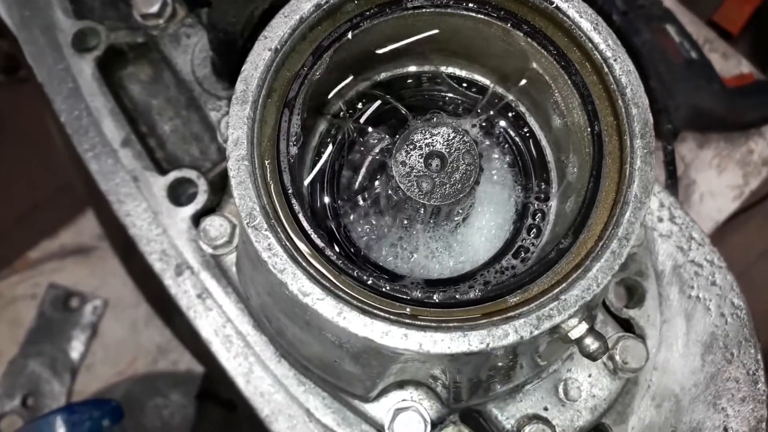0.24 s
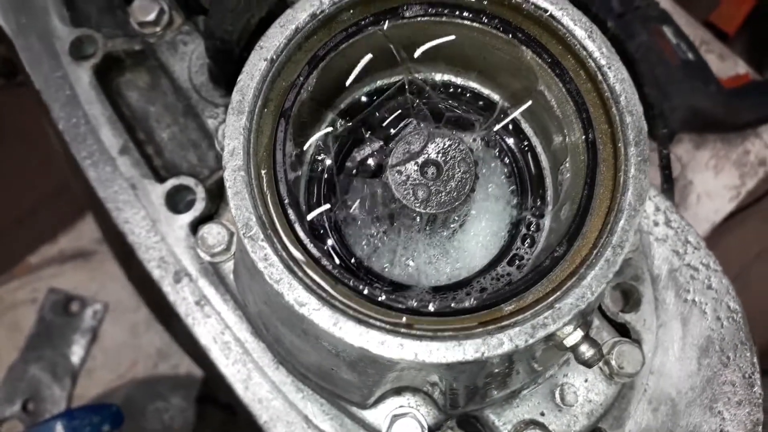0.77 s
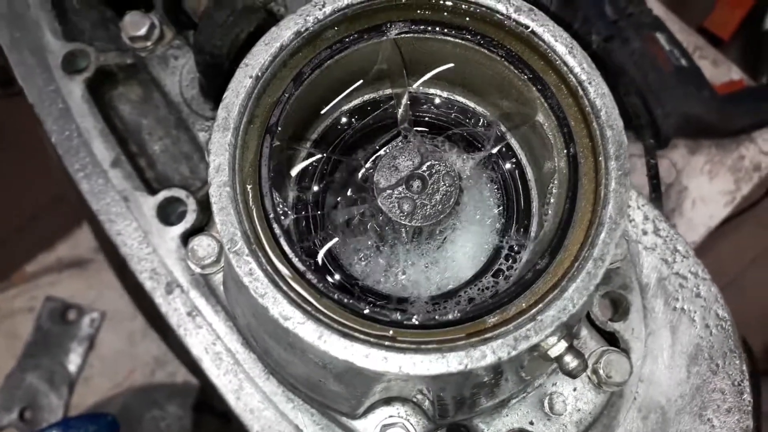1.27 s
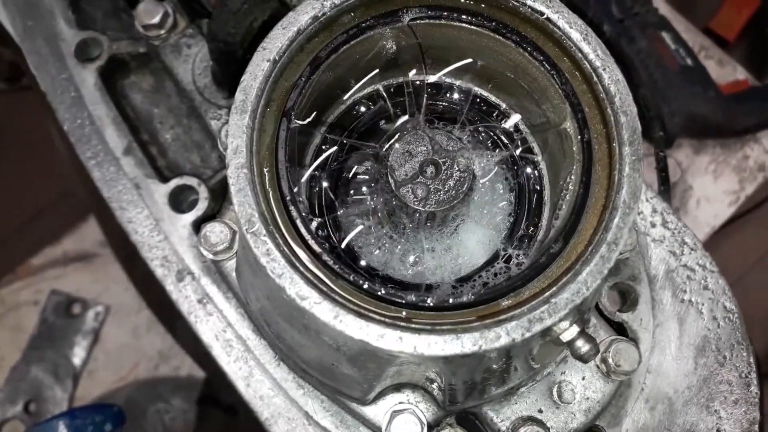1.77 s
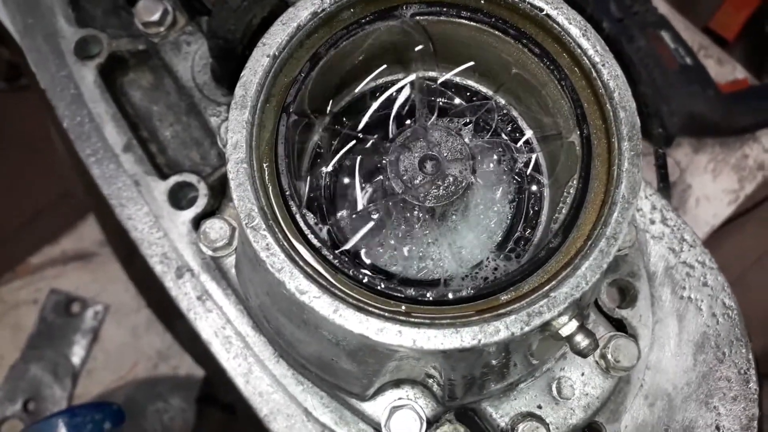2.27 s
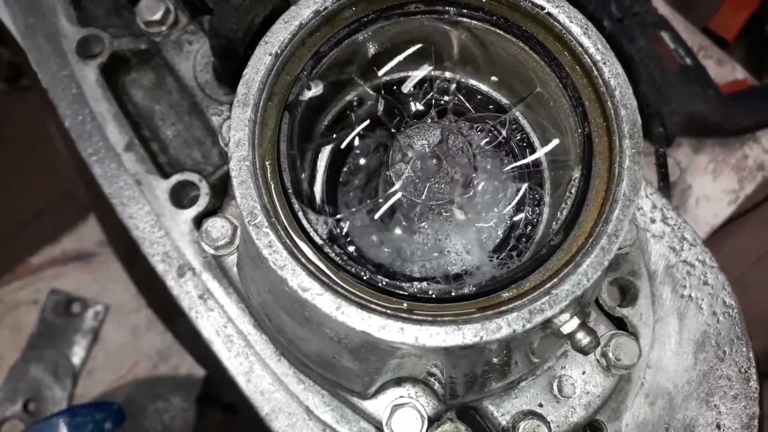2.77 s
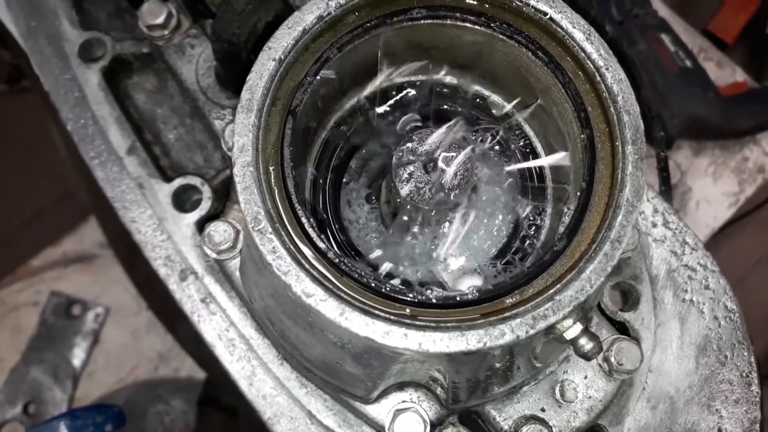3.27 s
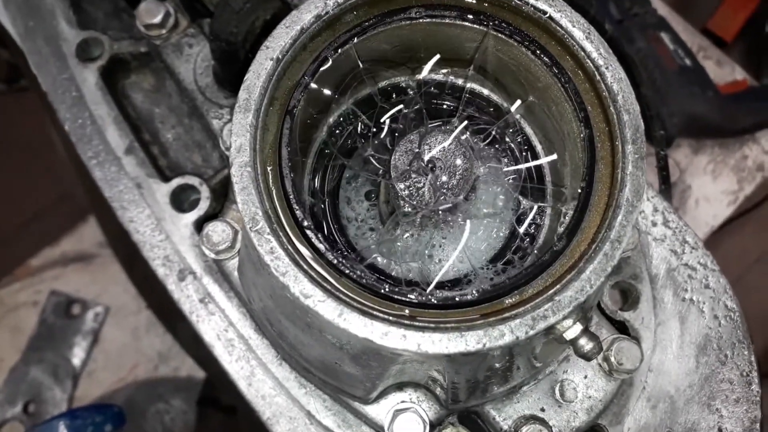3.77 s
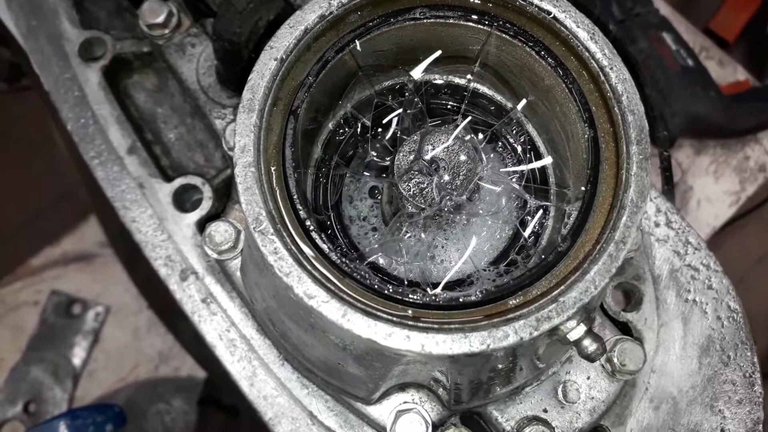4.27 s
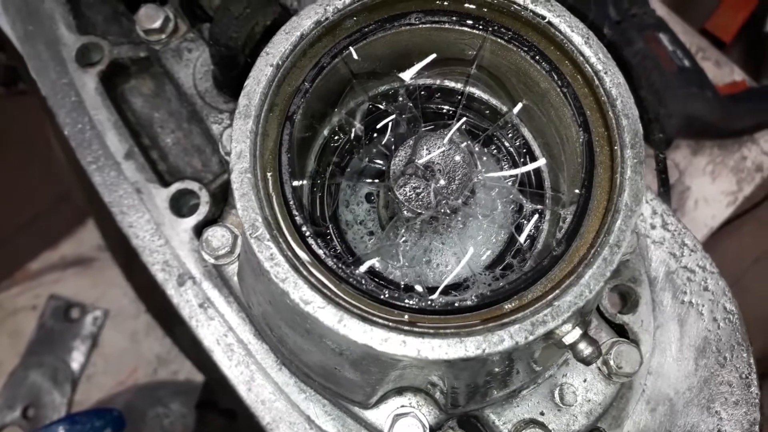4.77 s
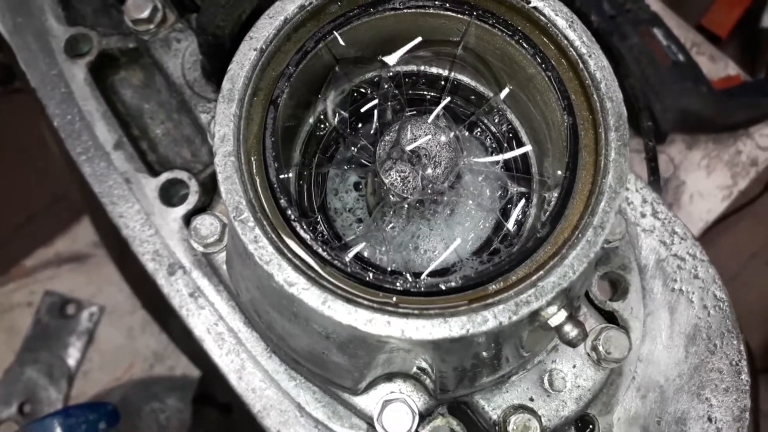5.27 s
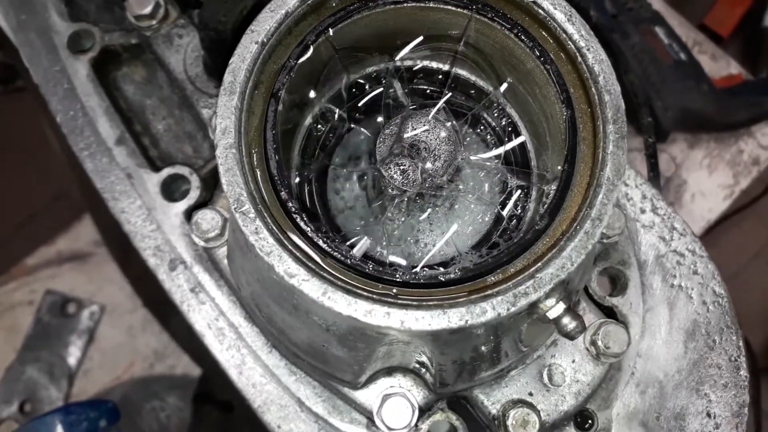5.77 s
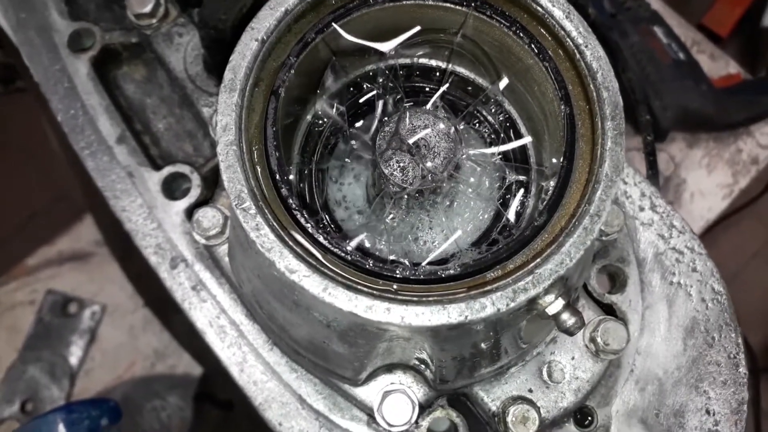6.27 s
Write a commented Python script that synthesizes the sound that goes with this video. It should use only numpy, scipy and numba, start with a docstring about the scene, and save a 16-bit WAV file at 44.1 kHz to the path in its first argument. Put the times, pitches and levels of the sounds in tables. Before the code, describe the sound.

Compressed air fizzes and sputters through a shallow pool of liquid in a metal housing, then spurts hard and settles into steady bubbling hiss.

```python
"""Compressed air leaks past a seal into a metal housing with a pool of liquid, near a phone in a quiet workshop.
At first swarms of damped sines fizz as bubbles, filtered noise puffs at the wet gap and air squirts in chirps.
At about 2 s a strong spurt blows the liquid aside: noise rushes and rings resonant modes of the housing.
The cleared gap then hisses on with thin singing jets, popping films and a few dull knocks.
A second spurt at about 5.6 s rings the housing again, and the hiss swells after it."""
import sys
import numpy as np
from scipy import signal
from scipy.fft import rfft, irfft, next_fast_len
from scipy.io import wavfile
from scipy.ndimage import uniform_filter1d, map_coordinates
from numba import njit

SR = 44100
rng = np.random.default_rng(int(sys.argv[2]) if len(sys.argv) > 2 else 0)


def output_pcm(signal):
    """Save a mono or channel-first signal as 16-bit PCM at the path in sys.argv[1].

    Samples are clipped to [-1, 1] before scaling.
    """
    pcm = np.clip(np.atleast_2d(signal).T, -1, 1) * 32767
    wavfile.write(sys.argv[1], SR, np.round(pcm).astype(np.int16))


N = 288414
TIME = np.arange(N) / SR  # s

# Strong spurts of air: [start t/s, end t/s, relative level of the rush/dB, relative level of the ring/dB]
SPURT_EVENTS = [(1.968, 2.105, -40.5, -37.5), (5.635, 5.831, -38.5, -39.5)]
# Short squirts of air, and at 0.623 s a surge of bubbling:
# [start t/s, length t/s, first f/Hz, last f/Hz, relative level/dB]
SQUIRT_EVENTS = [(.062, 0.044, 6360, 4200, -47), (0.135, 0.017, 5600, 4540, -53),
                 (0.302, 0.065, 7050, 4400, -51.5), (0.334, 0.094, 4760, 4200, -54.5),
                 (0.585, 0.064, 5170, 3950, -49), (0.623, 0.07, 3040, 2800, -53),
                 (0.667, 0.046, 4500, 4000, -49.5), (0.818, 0.071, 7900, 4670, -49.5),
                 (0.885, 0.036, 6600, 4530, -50), (0.912, 0.036, 8060, 4700, -51.5),
                 (0.954, 0.022, 5600, 4800, -50), (0.982, 0.051, 5100, 4500, -51.5),
                 (1.216, 0.052, 5200, 5000, -53), (1.369, 0.077, 6260, 3970, -49),
                 (1.45, 0.028, 7000, 5070, -56), (1.516, 0.0081, 6800, 6300, -49),
                 (1.557, 0.0061, 6560, 5170, -45), (1.596, 0.048, 6860, 4670, -51.5),
                 (1.69, 0.016, 6860, 6160, -47.5), (1.706, 0.0094, 6600, 4930, -45.5),
                 (1.76, 0.018, 5600, 5800, -48), (1.782, 0.01, 6540, 6560, -48),
                 (1.996, 0.038, 2920, 2550, -43.5), (5.66, 0.12, 2710, 2500, -42.5)]
# Notches where sound cancels between the pool and the rim: [centre f/Hz, width f/Hz, depth as level/dB]
RIM_NOTCHES = [(1947, 151, -11.5), (3567, 620, -9.5), (6220, 240, -6)]


def amp(db):
    """Decibels to gain."""
    return 10 ** (np.asarray(db) / 20)


def unit(x):
    """Scale to rms 1."""
    return x / np.sqrt(np.mean(x ** 2))


def curves(rows):
    """The columns of a timed table, interpolated to one value a sample."""
    times, *columns = np.transpose(rows)
    return [np.interp(TIME, times, column) for column in columns]


def add(track, start_s, sound):
    """Mix a sound into a track at a moment in seconds."""
    i = int(start_s * SR)
    track[i:i + len(sound)] += sound[:N - i]


def together(*gains):
    """Level of unrelated sounds that play at once: their powers add."""
    return np.sqrt(sum(gain ** 2 for gain in gains))


def swell(start_s, end_s, attack_s, release_s):
    """Envelope that rises linearly from the start, holds until the end and then dies away exponentially."""
    rise = np.clip((TIME - start_s) / max(attack_s, .001), 0, 1)
    return rise * np.exp(-np.maximum(TIME - end_s, 0) / release_s)


def walk(rate):
    """Random levels held 1 / rate s and smoothed twice; spread near 1."""
    hold = max(int(SR / rate), 1)
    steps = rng.standard_normal(N)[np.arange(N) // hold]
    return 1.3 * uniform_filter1d(uniform_filter1d(steps, hold), hold)


def colour(x, spectrum, notches=()):
    """Minimum-phase filter with a (Hz, dB) outline, steep skirts beyond it and rounded notches; rms 1."""
    size = 2 * next_fast_len(N // 2 + 4096)
    f = np.maximum(np.arange(size // 2 + 1) * SR / size, 1)
    hz, db = np.transpose(spectrum)
    octaves_outside = np.minimum(np.abs(np.log2(f / np.clip(f, hz[0], hz[-1]))), 1)
    gain_db = np.interp(np.log(f), np.log(hz), db) - 40 * octaves_outside
    gain_db += sum(depth / (1 + (2 * (f - centre) / width) ** 2) for centre, width, depth in notches)
    # folding the cepstrum onto positive time makes the filter causal
    cepstrum = irfft(np.log(amp(gain_db)))
    cepstrum[1:size // 2] *= 2
    cepstrum[size // 2 + 1:] = 0
    response = np.exp(rfft(cepstrum))
    return unit(irfft(rfft(x, size) * response)[:N])


@njit
def svf(x, hz, width):
    """State-variable band-pass with a moving centre, gain 1 there."""
    y, band, low = np.empty(len(x)), 0., 0.
    for i in range(len(x)):
        g = np.tan(np.pi * hz[i] / SR)
        k = np.pi * width / SR * (1 + g * g) / g
        v = (band + g * (x[i] - low)) / (1 + g * (g + k))
        band, low, y[i] = 2 * v - band, low + 2 * g * v, k * v
    return y


@njit
def ring_bubbles(starts, hz, cycles, size, rise):
    """Each bubble is a damped sine whose pitch climbs as it nears the surface."""
    y = np.zeros(N)
    for k in range(len(starts)):
        count = int(cycles[k] * SR / hz[k])  # samples until the bubble is 60 dB down
        z, step = size[k] + 0j, 2 * np.pi * hz[k] / SR
        turn = np.exp(1j * step - np.log(1000) / count)
        glide = np.exp(1j * step * rise / count)
        for i in range(starts[k], min(starts[k] + count, N)):
            z *= turn
            turn *= glide
            y[i] += z.imag
    return y


def swarm(low_hz, high_hz, cycles, spread_db, count):
    """Bubbles of mixed size born at random moments; a wider spread makes a few much louder than the rest."""
    when, size, life, loud, sign = rng.random((count, 5)).T
    starts = (when * N).astype(np.int64)
    low = np.broadcast_to(low_hz, N)[starts]
    hz = low * (high_hz / low) ** size
    strength = amp(-spread_db * np.log(1 - .99 * loud)) * np.sign(sign - .5)
    return ring_bubbles(starts, hz, cycles * (.5 + life), strength, 0.1)


def turbulence(flutter_db, flutter_rate):
    """Air noise that sputters as liquid closes and opens the gap."""
    return rng.standard_normal(N) * amp(flutter_db * walk(flutter_rate))


def background():
    """Quiet room noise, with a very faint left-right hiss of the microphones."""
    # Outlines of the room noise and the left-right hiss: [f/Hz, relative level per Hz/dB]
    room_outline = [(15, -26), (28, -13.5), (55, -1), (80, -2), (120, -0.5), (170, -4.5), (240, -11),
                    (450, -13.5), (800, -16), (4000, -37), (11000, -20), (16000, -13)]
    side_outline = [(15, -29), (25, 9), (673, -0.5), (1000, -10), (1280, -29), (1760, -23), (3260, -26),
                    (3630, -19), (7890, -14.5), (15000, -1)]
    room = amp(-74) * colour(rng.standard_normal(N), room_outline)
    side_hiss = amp(-88) * colour(rng.standard_normal(N), side_outline)
    return room + side_hiss * np.array([[1], [-1]])


def surges(decay_s):
    """Extra flow that rises with each squirt and dies away after it, in step with the air that it carried."""
    full_s, rise_s = 0.098, 0.017  # a squirt of the full length gives the full surge
    return together(*(amp(db) * np.sqrt(length / full_s) * swell(s, s + length, rise_s, decay_s)
                      for s, length, _, _, db in SQUIRT_EVENTS))


def bubbling():
    """Level of the bubbling: the steady flow and the surges as squirted air breaks up into bubbles."""
    # Steady flow through the pool: [t/s, relative level/dB]
    steady_flow = [(0.2, -56.5), (1.1, -57.5), (1.88, -59), (2.3, -52), (2.85, -53), (3.7, -54),
                   (5.5, -53.5), (6.05, -56.5), (6.48, -56.5)]
    level_db, = curves(steady_flow)
    return together(amp(level_db), amp(-6) * surges(decay_s=0.07))


def fizz(flow):
    """Large and middle-sized bubbles ring in the pool; the large ones get scarce as it froths."""
    # Frothing of the pool: [t/s, pitch of the largest bubbles f/Hz]
    frothing = [(0, 715), (2.0, 688), (2.5, 920), (3.0, 1030), (3.4, 1015), (4.0, 744), (5.3, 716),
                (5.47, 620), (5.7, 770), (6.2, 600), (6.54, 724)]
    # Outlines of the large and the middle-sized bubbles: [f/Hz, relative level per Hz/dB]
    large_outline = [(300, -35), (550, -14), (750, -4.5), (1500, 5), (1900, 3.5), (2400, -8), (4000, -43)]
    middle_outline = [(900, -33.5), (1700, -10), (2200, -9), (2600, 0), (3000, -0.5), (3400, 5.5),
                      (4000, -12.5), (5500, -14), (9000, -40)]
    clear_pool_hz, froth_db_per_octave, large_follow = 710, -10.5, 0.13  # follow: dB per dB of flow
    largest_hz, = curves(frothing)
    large = swarm(largest_hz, 2120, cycles=8.9, spread_db=1.0, count=14000)
    middle = swarm(2036, 3830, cycles=19.0, spread_db=2.0, count=26000)
    froth_db = froth_db_per_octave * np.log2(np.maximum(largest_hz / clear_pool_hz, 1))
    large_gain = amp(-57 + froth_db) * (flow / np.median(flow)) ** large_follow
    middle_gain = amp(2) * flow
    return (large_gain * colour(large, large_outline, RIM_NOTCHES)
            + middle_gain * colour(middle, middle_outline, RIM_NOTCHES))


def crackle(flow):
    """Bursting foam: broadband ticks at random moments whose level follows the bubbling."""
    chance, size = rng.random((2, N))
    ticks = (chance < 700 / SR) * amp(-3.6 * np.log(1 - .975 * size))  # about 700 a second
    outline = [(550, -21.0), (850, -5.5), (1500, -1.5), (2800, 6.5), (5500, -6.5), (8500, -31.0)]
    return amp(-3.5) * flow * colour(ticks, outline, RIM_NOTCHES)


def film_echo(x, echo_db, lag_s, drift):
    """A moving wall of foam echoes the hiss, so its peaks and hollows slide."""
    lag = lag_s * SR * (1 + drift * walk(4.1))
    gain = amp(echo_db)
    echo = map_coordinates(x, [np.arange(N) - lag], order=3)
    return (x + gain * echo) / np.sqrt(1 + gain ** 2)


def leak(flow):
    """Tiny bubbles and air noise at the gap: it puffs while wet and hisses on once the first spurt clears it."""
    # The gap once it is blown clear: [t/s, relative level of the hiss/dB, relative level of the fine hiss/dB]
    open_gap = [(2.24, -60.1, -63), (2.58, -58.5, -65.5), (2.78, -54, -63), (2.91, -54, -59.5),
                (2.96, -57, -62.7), (3.72, -58, -63), (3.78, -66.2, -67.8), (4.6, -69, -64.5),
                (4.85, -61, -63.5), (5.35, -58.5, -62), (5.39, -60, -71.5), (5.52, -67, -65.5),
                (5.61, -69, -61), (5.92, -55, -56.5), (6.22, -49.5, -53.5), (6.3, -57, -58),
                (6.5, -51, -54)]
    # Puffs that build until the wet gap chokes: [start t/s, end t/s, hiss and fine hiss: relative level/dB]
    puff_events = [(-.03, 0.05, -57, -65), (0.216, 0.29, -62, -68.5), (0.442, 0.507, -67, -65),
                   (0.483, 0.568, -56, -58), (.72, .815, -65.5, -86), (1.1, 1.188, -58.5, -69.5),
                   (1.17, 1.35, -65, -80), (1.59, 1.635, -62, -73), (1.66, 1.77, -58.5, -86)]
    # Outlines of the spray, the hiss and its two upper bands: [f/Hz, relative level per Hz/dB]
    spray_outline = [(2500, -14.5), (3600, -12), (4300, 2), (4750, -0.5), (5050, -5), (5450, 1.5),
                     (6100, -9), (7500, -43.5)]
    hiss_outline = [(5000, -20.5), (6200, -6), (6850, 0.5), (7500, -9.5), (8050, -9.5), (8500, -15.5),
                    (10000, -50)]
    fine_outline = [(7500, -27), (8400, -7.5), (8900, 8), (9300, 2.5), (9750, 0), (10600, 2), (11600, 2.5),
                    (12500, -1.5), (13200, 8), (14500, -9)]
    finest_outline = [(11500, -36), (13100, -22), (14000, -20.5), (14700, -4), (15300, -2), (16000, -5)]
    wet_spray_db, open_spray_db, surge_db = -59.5, -56.5, -9.5
    follows_hiss, follows_bubbling = 0.37, 1.84  # spray, dB per dB
    wet_hiss_db, wet_finest_db = -70, -78
    choke_db, choke_release_s, puff_release_s = -3.5, 0.048, 0.026

    hiss_db, fine_db = curves(open_gap)
    cleared = np.clip((TIME - SPURT_EVENTS[0][0]) / 0.075, 0, 1)
    puffs = [(swell(s, end, end - s, puff_release_s), puff_db, puff_fine_db)
             for s, end, puff_db, puff_fine_db in puff_events]
    hiss_gain = together(cleared * amp(hiss_db), *(shape * amp(db) for shape, db, _ in puffs))
    fine_gain = together(cleared * amp(fine_db + 2.5), *(shape * amp(db) for shape, _, db in puffs))

    # a squirt starves the steady wet hiss for a moment
    starving = sum(swell(s, s + length, .02, choke_release_s) for s, length, *_ in SQUIRT_EVENTS)
    choke = amp(choke_db * np.minimum(starving, 1))
    hiss_gain = together(choke * amp(wet_hiss_db), hiss_gain)
    finest_gain = together(choke * amp(wet_finest_db), fine_gain)

    # spray needs both air and liquid
    wetness = np.minimum(flow / np.median(flow), 1.4)
    open_spray = amp(open_spray_db + follows_hiss * (hiss_db - np.median(hiss_db)))
    open_spray = open_spray * wetness ** follows_bubbling
    spray_gain = together(amp(wet_spray_db) * (1 - cleared) * wetness, cleared * open_spray,
                          amp(surge_db) * surges(decay_s=0.062))

    tiny_bubbles = swarm(3300, 7150, cycles=14, spread_db=0.0, count=26000)
    spray = colour(tiny_bubbles, spray_outline, RIM_NOTCHES) * spray_gain * amp(2.5)
    hiss = colour(turbulence(1.3, 500), hiss_outline, RIM_NOTCHES) * hiss_gain * amp(2.9)
    fine = colour(turbulence(1.6, 600), fine_outline) * fine_gain
    finest = colour(turbulence(1.8, 400), finest_outline) * finest_gain
    flicker = amp(2.4 * (1.5 - cleared) * walk(32.6))  # deeper while the gap is wet
    treble = film_echo(flicker * (fine + finest), echo_db=-11, lag_s=0.000452, drift=0.11)
    return spray + hiss + treble


def housing(x, slosh, tilt_db):
    """Band-pass modes of the metal housing, tilted in dB per octave about a pivot."""
    # Ring of the housing: [f/Hz, width f/Hz, relative level/dB]
    modes = [(1002, 30, -9), (1160, 32, -7), (1510, 45, -13), (1825, 34, -9), (2425, 28, -4), (2508, 58, 0),
             (2585, 24, -5), (2790, 45, -11), (3290, 38, -9), (3388, 34, -2), (3790, 50, -13),
             (4250, 80, -10), (4683, 24, -7), (4850, 34, -8), (5112, 44, -6), (6230, 38, -11),
             (6780, 44, -11)]
    pivot_hz = 2620
    return sum(amp(db + tilt_db * np.log2(hz / pivot_hz)) * svf(x, hz * slosh, 1. * width)
               for hz, width, db in modes)


def reflections(x, wet_db, t60):
    """Dense short echoes from the metal walls and the bench: a decaying noise tail."""
    t = TIME[:SR // 5]
    tail = rng.standard_normal(len(t)) * np.exp(-np.log(1000) * t / t60) * (t > .001)
    return x + amp(wet_db) * signal.fftconvolve(x, tail / np.linalg.norm(tail))[:N]


def jets():
    """Narrow bands of hiss from single pinholes; their pitch slides and wanders."""
    # Thin jets that sing: [start t/s, end t/s, first f/Hz, last f/Hz, width of each filter f/Hz, relative level/dB]
    jet_events = [(0, .09, 14100, 13700, 900, -66), (.36, .56, 15900, 14800, 700, -70),
                  (0.483, .6, 11000, 10600, 900, -60), (0.764, .84, 13800, 13500, 750, -60),
                  (.94, 1.0, 15800, 14600, 700, -60), (1.03, 1.155, 13000, 13100, 700, -74),
                  (1.22, 1.33, 15600, 15500, 600, -59), (1.32, 1.38, 14800, 13500, 900, -59),
                  (1.49, 1.62, 13400, 13300, 500, -71), (2.19, 2.372, 15500, 15100, 800, -51),
                  (2.2, 2.5, 13200, 13700, 600, -58.5), (2.323, 2.515, 15200, 14500, 900, -49),
                  (2.522, 3.262, 15500, 15000, 700, -53.5), (2.616, 2.93, 15400, 15200, 900, -51),
                  (2.228, 2.76, 6640, 6350, 350, -54.5), (2.206, 2.944, 8300, 8000, 504, -61),
                  (2.605, 3.764, 10400, 11900, 1090, -63), (5.866, 6.54, 7450, 7500, 350, -56),
                  (6.05, 6.262, 7100, 6900, 350, -51.5)]
    fade_s = 0.036
    out = np.zeros(N)
    for s, end, first_hz, last_hz, width, db in jet_events:
        age = np.linspace(0, 1, int((end - s) * SR))
        slide = first_hz + (last_hz - first_hz) * age
        centre = slide * (1 + 0.0049 * walk(9)[:len(age)])
        band = svf(svf(rng.standard_normal(len(age)), centre, 1. * width), centre, 1. * width)
        fade = np.clip(np.minimum(age, 1 - age) * (end - s) / fade_s, 0, 1)
        add(out, s, amp(db) * unit(band) * fade)
    return out


def squirts():
    """Air swells at the gap, or bubbling surges: a resonance glides and then settles while the flow sputters."""
    out, air = np.zeros(N), turbulence(3.5, 450)
    for s, length, first_hz, last_hz, db in SQUIRT_EVENTS:
        age = np.linspace(0, 1, int(length * SR))
        hz = last_hz + (first_hz - last_hz) * np.exp(-age / 0.33)
        width = 0.28 * last_hz
        band = svf(svf(air[int(s * SR):][:len(age)], hz, width), hz, width)
        envelope = np.minimum(age / 0.03, 1) * (1 - age) ** 0.33
        add(out, s, amp(db) * unit(band * envelope))
    outline = [(2000, 4.0), (7700, -1.0), (9500, -13)]
    return amp(0.6) * np.std(out) * colour(out, outline, RIM_NOTCHES)


def pops():
    """A film bursts: a tiny crack of noise and a few cycles of ring."""
    # Single bubbles that burst: [t/s, relative peak level/dB, f/Hz]
    pop_events = [(0.606, -26, 4480), (0.886, -23, 4630), (0.901, -23, 4760), (0.9866, -33, 4900),
                  (1.2466, -32, 2650), (1.375, -26, 5700), (1.4435, -30, 2820), (1.7488, -39, 5560),
                  (2.447, -26, 6670), (2.9035, -25, 2800), (3.128, -33.5, 2590), (3.7378, -30, 2490),
                  (4.352, -27, 2520), (4.8067, -26, 2640), (5.362, -32, 6800), (5.46, -27, 2680)]
    out, t = np.zeros(N), TIME[:SR // 50]
    for s, db, hz in pop_events:
        ring = np.sin(2 * np.pi * hz * t) * np.exp(-t / 0.0025)
        crack = 0.61 * rng.standard_normal(len(t)) * np.exp(-t / 0.00049)
        pop = ring + crack
        add(out, s, amp(db - 7.5) * pop / np.abs(pop).max())
    return signal.sosfilt(signal.butter(4, [750, 7500], "band", fs=SR, output="sos"), out)


def spurts():
    """The seal lifts: a broad rush of air, and the uncovered housing rings with it, low modes first."""
    # Outline of the rush: [f/Hz, relative level per Hz/dB]
    rush_outline = [(350, -46), (600, -38), (850, -33), (1500, -0.5), (2000, 3), (2700, -7.5), (3600, 6),
                    (5000, -3), (6800, 1), (8000, -3.5), (10000, -10.5), (13000, -5), (16000, -3)]
    rush_attack_s, rush_release_s = 0.13, 0.049
    lag_s, attack_s, sag_db_per_s, release_s = 0.0089, 0.046, -21, 0.069  # of the ring
    brightening, level_age_s = 53, 0.069  # dB per octave and second; age at which the ring has no tilt
    rush_gain = ring_gain = tilt_db = 0
    for s, end, rush_db, ring_db in SPURT_EVENTS:
        # the root steepens the onset and doubles the release time
        rush_gain += amp(rush_db) * swell(s, end, rush_attack_s, rush_release_s / 2) ** .5
        sag_db = sag_db_per_s * np.maximum(TIME - s - lag_s - attack_s, 0)
        ring_gain += amp(ring_db + sag_db) * swell(s + lag_s, end, attack_s, release_s)
        age = np.minimum(TIME - s, level_age_s + 0.056)
        tilt_db = np.where(TIME > s, brightening * (age - level_age_s), tilt_db)
    half_notches = [(hz, width, .5 * db) for hz, width, db in RIM_NOTCHES]
    rush = colour(turbulence(1.7, 350), rush_outline, half_notches)
    # the thrown liquid loads the housing, so its pitches waver
    slosh = 1 + .002 * walk(40)
    ring = housing(turbulence(0.78, 120), slosh, tilt_db)
    # the small opening radiates no bass
    ring = unit(signal.sosfilt(signal.butter(4, 780, "high", fs=SR, output="sos"), ring))
    return amp(-5.0) * rush_gain * rush + ring_gain * ring


def knocks():
    """Faint dull bumps that swell over their first cycle: a low tone and a noisy thud around it."""
    # Soft knocks: [t/s, peak level/dB, f/Hz, time to fall 60 dB t/s]
    knock_events = [(2.717, -61, 466, 0.014), (5.304, -70, 317, .04), (5.31, -52.5, 126, 0.046)]
    out, t = np.zeros(N), TIME[:SR // 5]
    for s, db, hz, t60 in knock_events:
        band = signal.butter(2, [hz / 2, hz * 1.34], "band", fs=SR, output="sos")
        thud = unit(signal.sosfilt(band, rng.standard_normal(len(t))))
        envelope = np.exp(-np.log(1000) * t / t60) * np.minimum(t * hz, 1)
        bump = (np.sin(2 * np.pi * hz * t) + amp(-7) * thud) * envelope
        add(out, s, amp(db) * bump / np.abs(bump).max())
    return out


def scene():
    """The pool heaves and modulates all bubbling, and the housing colours it; only the faint hiss has width."""
    heave, flow = amp(0.7 * walk(90)), bubbling()
    pool = heave * (fizz(flow) + crackle(flow) + leak(flow)) + jets() + squirts() + pops()
    pool = pool + amp(-14) * housing(pool, np.ones(N), 0)
    near = reflections(pool, wet_db=-12.5, t60=0.16) * amp(-3.0) + spurts() + knocks()
    return near + background()


def record(dry):
    """The phone cuts the top of the treble with a steep elliptic low-pass."""
    top_hz = 15800
    return signal.sosfilt(signal.ellip(12, .2, 80, top_hz, fs=SR, output="sos"), dry)


dry = scene()
out = record(dry)
output_pcm(out)
```